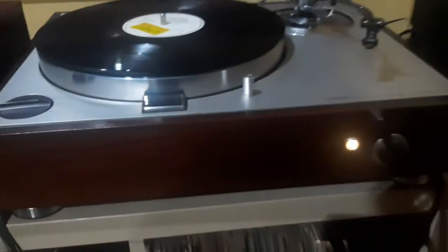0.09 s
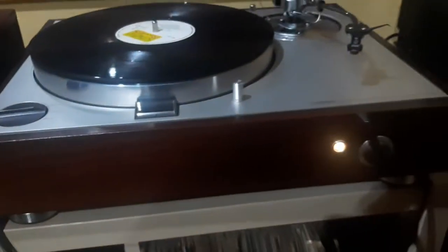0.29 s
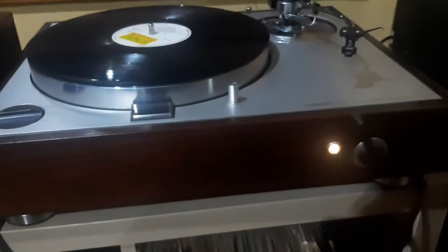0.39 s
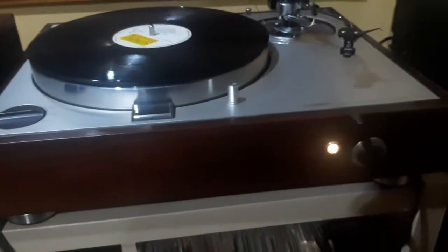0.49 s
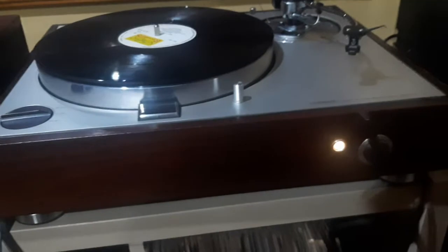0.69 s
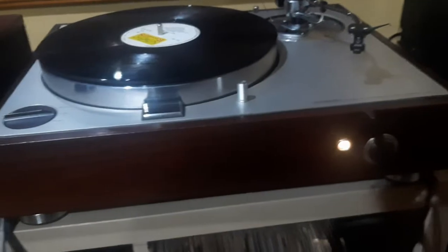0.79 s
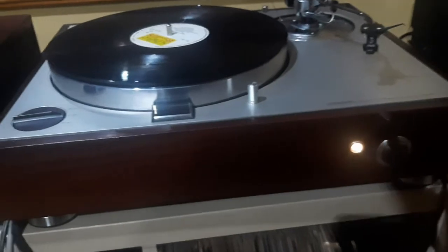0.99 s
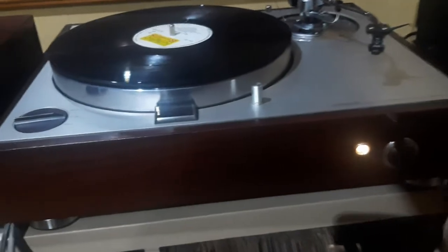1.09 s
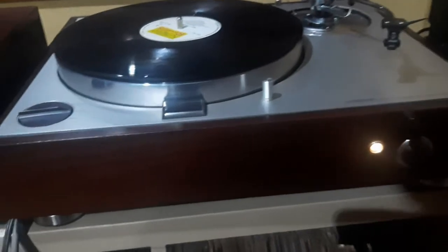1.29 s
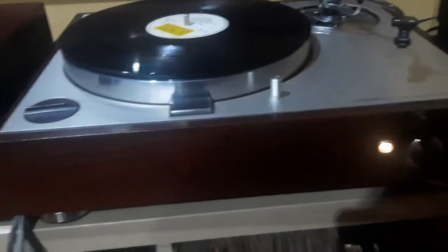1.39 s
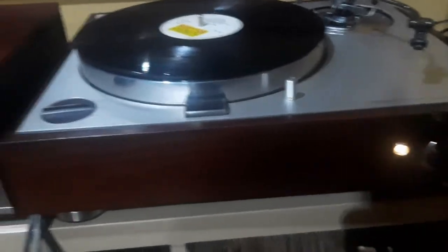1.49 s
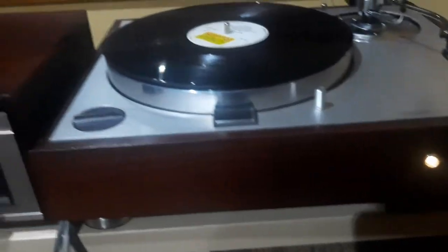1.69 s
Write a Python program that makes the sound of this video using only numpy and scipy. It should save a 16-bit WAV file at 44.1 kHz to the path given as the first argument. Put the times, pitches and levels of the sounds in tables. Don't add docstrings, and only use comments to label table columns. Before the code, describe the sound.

A small diaphragm pump knocks in rapid soft pulses as a lever rattles and clunks over

```python
import sys
import numpy as np
from scipy import signal
from scipy.fft import rfft, irfft, next_fast_len
from scipy.io import wavfile
from scipy.ndimage import uniform_filter1d

SR = 44100
rng = np.random.default_rng(int(sys.argv[2]) if len(sys.argv) > 2 else 0)


def digitize_waveform(pressure):
    field = np.atleast_2d(pressure).T
    bounded = np.clip(field, -1, 1)
    quanta = np.round(bounded * 32767).astype(np.int16)
    wavfile.write(sys.argv[1], SR, quanta)


def amplitude_ratio(level_db):
    exponent = np.asarray(level_db, float) / 20
    return 10 ** exponent


N = 74970
LEAD = SR // 10
M = next_fast_len(N + SR)
TIME_S = (np.arange(N + LEAD) - LEAD) / SR


def butter(x, order, hz, kind="low"):
    return signal.sosfilt(signal.butter(order, hz, kind, fs=SR, output="sos"), x)


def at_hz(points, hz, column=1):
    points = np.array(points)
    return np.interp(np.log(hz + 1), np.log(points[:, 0]), points[:, column])


def colour(x, points):
    gain = amplitude_ratio(at_hz(points, np.arange(M // 2 + 1) * SR / M))
    return irfft(rfft(x, M) * gain, M)[..., :N + LEAD]


def noise(points, db):
    x = colour(rng.standard_normal(M), points)
    return amplitude_ratio(db) * x / x.std()


def train(s, gain):
    out = np.zeros(N + LEAD)
    place = (np.ravel(s) * SR).astype(int) + LEAD
    np.add.at(out, np.clip(place, 0, N + LEAD - 1), np.ravel(gain))
    return out


def body(clicks, modes):
    out = 0
    for k, (hz, db, t60) in enumerate(modes):
        r = amplitude_ratio(-60 / (t60 * SR))
        w = 2 * np.pi * hz / SR
        ring = signal.lfilter([0, np.sin(w)], [1, -2 * r * np.cos(w), r * r], clicks + 1e-18)
        out = out + (-1) ** k * amplitude_ratio(db) * ring
    return out


def burst(clicks, length_s):
    r = np.exp(-1 / (length_s * SR))
    return signal.lfilter([1], [1, -r], np.abs(clicks)) * rng.standard_normal(N + LEAD)


def strokes(table, touches, cabinet, valve):
    s, db, share_db = np.transpose(table)
    offset, push_db, knock_db = np.transpose(touches)
    jitter_s, spread_db = .00006, 1.2
    chance = rng.standard_normal((len(s), 3, len(offset)))
    at = s[:, None] + offset + jitter_s * chance[:, 0]
    level_db = db[:, None] - 9.0
    push = amplitude_ratio(level_db + push_db + share_db[:, None] + spread_db * chance[:, 1])
    knock = amplitude_ratio(level_db + knock_db + spread_db * chance[:, 2])
    soft = butter(train(at, push), 2, 600)
    hard = signal.lfilter(np.hanning(32), 32 / 2.87, train(at, knock)) * 1.85
    return body(soft, cabinet) + body(hard, valve)


# (time [s], level [dB], cabinet share [dB])
PULL_STROKES = [
    (.046, -43.5, 8.5),
    (.262, -47, -12),
    (.455, -54, 8.5),
    (.660, -43.5, 4.5),
    (.881, -47.5, 7),
    (1.111, -45, 4.5),
    (1.357, -45, 6),
    (1.613, -46, 8),
]
# (offset [s], push on cabinet [dB], knock on valve [dB])
PULL_CONTACTS = [(-.022, -11.5, -34), (-.016, -11, -0.5), (-.012, -9, -9), (-.008, -2, -0.5),
                 (-.003, -0.5, 2), (.002, -2, -2.5), (.008, 2.5, -31), (.020, -12.5, -14),
                 (0.026, -9, -3.5), (0.035, -18.5, -17)]
# (frequency [Hz], level [dB], t60 [s])
PULL_CABINET_MODES = [(108, -54, 0.031), (200, -4, 0.042), (312, -2, 0.02), (473, -5.5, 0.0087)]
PULL_VALVE_MODES = [(663, -28, 0.08), (907, -5, 0.13), (1000, -5, 0.027), (1093, -2.5, 0.036),
                    (1206, -10.5, 0.026), (2265, -6.5, 0.025)]
# (time [s], level [dB], cabinet share [dB])
PUSH_STROKES = [
    (.111, -39.5, -6.5),
    (.322, -49, -5),
    (.528, -45.5, -4),
    (.729, -45, -2),
    (.948, -44, -2),
    (1.179, -41.5, -1.5),
    (1.423, -42, -2.5),
    (1.680, -44.5, -1),
]
# (offset [s], push on cabinet [dB], knock on valve [dB])
PUSH_CONTACTS = [(-.009, -2, -16), (-.005, 0, -8), (-.003, -18, -1.5), (.001, -3, -9.5), (.005, -7.5, -5),
                 (.008, -5.5, -4.5), (0.011, -10, -11.5), (0.023, -12.5, -15), (0.03, -5.5, -25)]
# (frequency [Hz], level [dB], t60 [s])
PUSH_CABINET_MODES = [(98, -3, 0.038), (175.7, 4, 0.042), (300, 5.5, 0.025), (442.7, 0.5, 0.056)]
PUSH_VALVE_MODES = [(680, -16.5, 0.065), (955, -7, 0.045), (1072, -2.5, 0.051), (1525, -2.5, 0.025),
                    (2074, -12.5, 0.063), (2700, -7, 0.011)]


def diaphragm_pump():
    pull = strokes(PULL_STROKES, PULL_CONTACTS, PULL_CABINET_MODES, PULL_VALVE_MODES)
    push = strokes(PUSH_STROKES, PUSH_CONTACTS, PUSH_CABINET_MODES, PUSH_VALVE_MODES)
    return pull + push


# (time [s], level [dB])
CLUNK_CONTACTS = [(0.4071, -28), (0.4162, -24.5), (0.4195, -26.5), (0.425, -29), (0.433, -32.5),
                  (0.4434, -29), (0.45, -34), (0.4555, -35.5), (.461, -43), (.472, -52), (.477, -34),
                  (.492, -37.5), (.498, -44), (.515, -43.5), (.537, -52), (0.556, -47), (.57, -47)]
# (frequency [Hz], level [dB], t60 [s])
CLUNK_BODY_MODES = [(128, -38, 0.13), (213, -12, 0.22), (249, -3.5, 0.065), (302, -3.5, 0.052),
                    (357, -9, 0.048), (435.3, 0.5, 0.061), (492, -0.5, 0.038), (541.6, 1.5, 0.041),
                    (603, 1.5, 0.029), (614, -2, 0.047), (670, 0.5, 0.043), (750, -3, 0.029),
                    (1045, -3.5, 0.035), (1272, -12.5, 0.04)]


def clunk():
    s, db = np.transpose(CLUNK_CONTACTS)
    return amplitude_ratio(-7.0) * body(train(s, amplitude_ratio(db)), CLUNK_BODY_MODES)


def shiver(contacts):
    start_s, level_db, t60_s = .42, -66.5, 0.28
    fade = amplitude_ratio(level_db - 60 * np.abs(TIME_S - start_s) / t60_s)
    return body(contacts * (TIME_S > start_s) * fade, CLUNK_BODY_MODES)


# (time [s], level [dB], frequency [Hz], t60 [s])
LEVER_KNOCKS = [(-.004, -42, 1000, 0.081), (0.016, -61, 2330, 0.05), (.157, -57.5, 300, 0.14),
                (0.175, -55.5, 342, 0.1), (0.229, -40, 1130, 0.036), (0.232, -49, 1983, 0.27),
                (.246, -53, 1960, 0.077), (.222, -58, 2417, 0.16), (0.2404, -39.5, 214.7, 0.17),
                (0.2572, -37.5, 1091, 0.088), (0.265, -45, 1055, 0.13), (0.272, -38, 300, 0.012),
                (0.292, -45, 1034, 0.087), (.31, -52.5, 334, 0.064), (0.42, -48, 213, 0.085),
                (.421, -41, 683, 0.029), (0.438, -36.5, 213, 0.14), (0.471, -43, 213, 0.033),
                (.276, -44.5, 213, 0.13), (.305, -50.5, 200, .12), (.417, -35, 607, 0.029),
                (.444, -35, 500, 0.039), (0.621, -54.5, 200, 0.1), (.645, -52, 190, .1)]


def lever_knocks():
    return sum(body(train(s, amplitude_ratio(db)), [(hz, 0, t60)]) for s, db, hz, t60 in LEVER_KNOCKS)


# (start [s], attack [s], length [s], level [dB])
RATTLE_SPELLS = [
    (-.05, 0.00021, 0.021, -39.5),
    (0.214, 0.0056, 0.056, -47),
    (0.225, 0.002, 0.03, -45),
    (0.243, 0.0027, 0.065, -55),
    (0.4055, 0.00069, 0.019, -38.5),
    (0.441, 0.0051, 0.022, -46.5),
    (1.27, 0.2, 0.38, -68.5),
]
# (frequency [Hz], level [dB], t60 [s])
SWITCH_MODES = [(356, -6, 0.077), (533, 0, 0.025), (1000, -18.5, 0.052), (1050, -18, 0.03),
                (1960, -9, 0.032), (1934, -11.5, 0.043), (2392, -16, 0.043), (2664, -22, 0.037),
                (3078, -20.5, 0.043), (3243, -17, 0.064), (4130, -20, 0.013)]
# (frequency [Hz], level [dB])
CRACK_COLOUR = [(300, -3), (900, 8.5), (2000, 6), (3500, -2), (5500, -9.5), (6800, -22.5), (8800, -37),
                (11500, -26)]


def rattle(contacts):
    envelope = 0
    for s, attack, length, db in RATTLE_SPELLS:
        rise = np.clip((TIME_S - s) / attack, 0, 1)
        fall = np.clip((s + length - TIME_S) / (0.83 * length), 0, 1)
        envelope = envelope + amplitude_ratio(db) * rise * fall
    grains = envelope * contacts
    cracks = amplitude_ratio(-2.5) * 4 * grains
    return amplitude_ratio(-19.0) * body(grains, SWITCH_MODES) + colour(cracks, CRACK_COLOUR)


def switch():
    contacts_per_s = 5000
    struck = rng.random(N + LEAD) < contacts_per_s / SR
    contacts = struck * rng.standard_normal(N + LEAD)
    knocks, thud = lever_knocks(), clunk()
    loose = rattle(contacts) + shiver(contacts)
    blows = amplitude_ratio(-10) * knocks + amplitude_ratio(-9) * thud
    return butter([knocks + thud + loose, blows, loose], 2, 83, "high")


# (frequency [Hz], t60 [s], level [dB])
ROOM_DECAY = [(59, 0.38, 9), (190, 0.33, 1.5), (450, 0.54, 1), (1130, 0.5, -1.5), (2330, 0.44, -0.5),
              (5060, 0.42, -1), (11600, 0.29, -3)]
# (frequency [Hz], coherence [0-1])
PORT_LIKENESS = [(60, 0.7), (300, 0.86), (640, 0.43), (1400, 0), (15000, 0.17)]


def room_tail():
    t = np.arange(SR * 3 // 4) / SR
    tail = 0
    white = rng.standard_normal((2, 2, len(t)))
    edges = 40 * 2 ** np.arange(0, 9, .5)
    for k, (low, high) in enumerate(zip(edges, edges[1:])):
        mid, side = butter(white[k % 2], 2, [low, high], "band")
        hz = np.sqrt(low * high)
        alike = np.clip(at_hz(PORT_LIKENESS, hz), 0, 1)
        t60 = at_hz(ROOM_DECAY, hz)
        decay = amplitude_ratio(at_hz(ROOM_DECAY, hz, column=2) - 60 * t / t60)
        onset = np.clip((t - .003) / 0.0028, 0, 1)
        shape = decay * onset / np.sqrt(t60 * SR / 14)
        tail = tail + shape * (np.sqrt(1 + alike) * mid + np.sqrt(1 - alike) * side * [[1], [-1]])
    return tail


def room(ringing, loose):
    tail = room_tail()
    wobble = butter(rng.standard_normal(len(loose)), 2, 90)
    scatter = 0.67
    scattered = np.sqrt(1 - scatter) + np.sqrt(scatter) * wobble / wobble.std()
    x = loose + ringing * scattered
    return irfft(rfft(x, M) * rfft(tail, M), M)[:, :N + LEAD]


# (time [s], peak level [dB])
PORT_TICKS = [(0.137, -65), (0.1528, -56.5), (0.228, -51.5), (0.2507, -50.5), (0.2564, -52), (0.3416, -61),
              (0.358, -56.5), (0.409, -47.5), (0.4434, -67), (0.4599, -53), (0.5454, -63), (0.648, -63),
              (0.6962, -60.5), (0.7507, -61), (0.854, -62), (0.9567, -64), (0.9714, -56.5), (1.045, -57),
              (1.050, -55.5), (1.0558, -59), (1.0921, -56), (1.0956, -51), (1.1022, -52), (1.1612, -54.5),
              (1.1763, -52.5), (1.264, -64), (1.3365, -60), (1.6737, -61)]
# (time [s], level [dB])
GRIP_LEVEL = [(0, -77), (0.198, -70.5), (.5, -69.5), (0.851, -74.5), (.985, -72), (0.998, -67), (1.02, -68),
              (1.06, -66), (1.07, -62), (1.08, -70), (1.125, -68), (1.135, -56.5), (1.145, -70.5),
              (1.209, -71), (1.4, -74), (1.7, -88)]


def grip_crackle():
    crackle_per_s = 10700
    grip = amplitude_ratio(np.interp(TIME_S, *np.transpose(GRIP_LEVEL)))
    slips = (rng.random(N + LEAD) < crackle_per_s / SR) * rng.exponential(1, N + LEAD)
    return burst(grip * slips, 0.000081)


def left_port_ticks():
    s, db = np.transpose(PORT_TICKS)
    spray = burst(train(s, amplitude_ratio(db + 11)), .0012) + grip_crackle()
    upper = butter(spray, 2, [10240, 12760], "band")
    lower = butter(spray, 2, [4990, 5460], "band")
    broad = butter(spray, 2, [4200, 14000], "band")
    return upper + amplitude_ratio(-3) * lower + amplitude_ratio(-14) * broad


# (frequency [Hz], density [dB per Hz])
AIR_COLOUR = [(35, -24), (90, -1), (300, -1.5), (700, -6.5), (1400, -10), (2200, -18), (3200, -31.5),
              (7000, -37.5)]


def room_tone():
    air_db = -68
    shared = butter(noise(AIR_COLOUR, air_db), 2, 900)
    return shared + [noise(AIR_COLOUR, air_db - 5.5), noise(AIR_COLOUR, air_db)]


# (frequency [Hz], density [dB per Hz])
LEFT_HISS = [(1500, -7.5), (4800, -11), (5300, -7.5), (5800, -13), (9300, -17), (10800, -6.5), (12500, -13),
             (15500, -4.5)]
RIGHT_HISS = [(1500, 15.5), (4000, 5), (7000, 1), (11000, 2.5), (15500, 7.5)]


def self_noise():
    slow = rng.standard_normal(N + LEAD)
    for _ in range(2):
        slow = uniform_filter1d(slow, size=400)
    flicker_db = 1.5 * slow / slow.std()
    return noise(LEFT_HISS, -70.5) * amplitude_ratio(flicker_db), noise(RIGHT_HISS, -70)


# (frequency [Hz], left minus right [dB])
PORT_COLOUR = [(100, 2), (640, 0), (1150, -0.5), (2300, -17), (4000, -5.5), (5300, 1), (8000, 17),
               (11500, 31), (15000, 21)]


def scene():
    pump = diaphragm_pump()
    lever, blows, loose = switch()
    near = pump + lever
    n = np.arange(N + LEAD)
    left_lag_s = 0.00021
    late = np.interp(n - left_lag_s * SR, n, near)
    direct = np.array([late, near]) * amplitude_ratio(2)
    both = direct + room(blows + amplitude_ratio(-6.5) * pump, loose) + room_tone()
    half = np.array(PORT_COLOUR) * [1, .5]
    left_hiss, right_hiss = self_noise()
    left = colour(both[0], half) + left_port_ticks() + left_hiss
    right = colour(both[1], half * [1, -1]) + right_hiss
    return np.array([left, right])[:, LEAD:]


def band_limit(x):
    return signal.sosfilt(signal.butter(12, 15730, fs=SR, output="sos"), x)


def record(dry):
    x = butter(dry, 2, 70, "high")
    band = signal.butter(1, [250, 2600], "band", fs=SR, output="sos")
    middle = signal.sosfiltfilt(band, x)
    gate_s, threshold_db, slope, depth_db = .025, -59.5, 0.93, 11
    power = uniform_filter1d(np.mean(middle ** 2, axis=0), int(gate_s * SR))
    level_db = 10 * np.log10(power + 1e-12)
    sink_db = np.clip(slope * (level_db - threshold_db), -depth_db, 0)
    x = x + middle * (amplitude_ratio(sink_db) - 1)
    x = signal.sosfilt(signal.cheby2(10, 50, 16150, fs=SR, output="sos"), x)
    return band_limit(x)


dry = scene()
out = record(dry)
digitize_waveform(out)
```